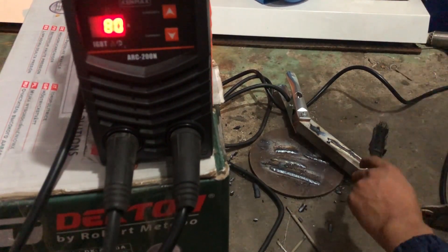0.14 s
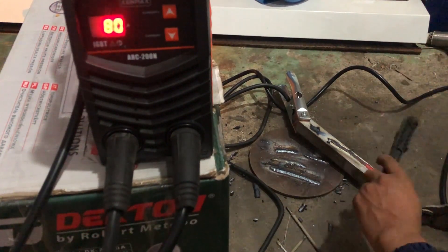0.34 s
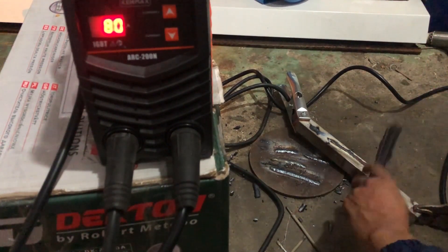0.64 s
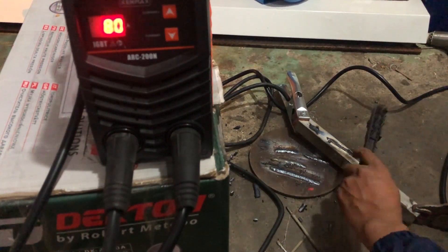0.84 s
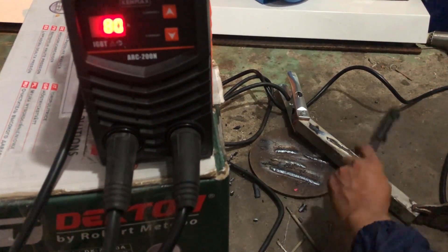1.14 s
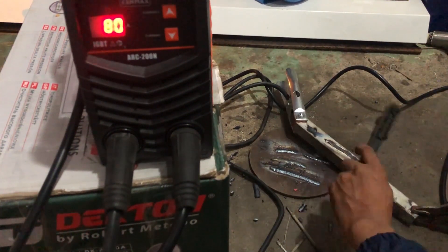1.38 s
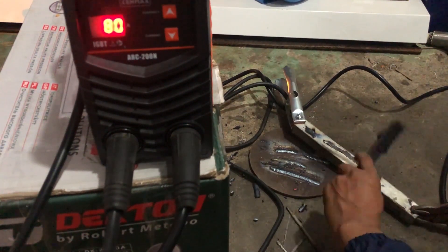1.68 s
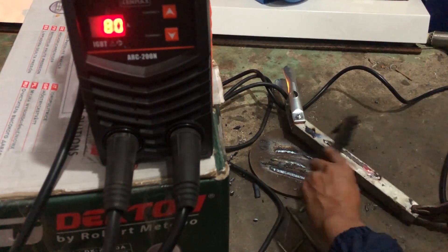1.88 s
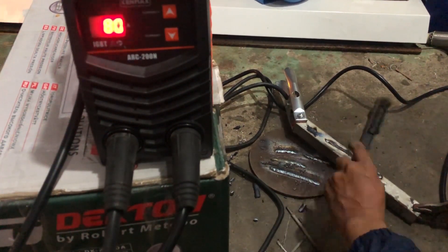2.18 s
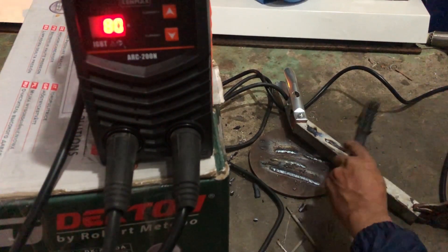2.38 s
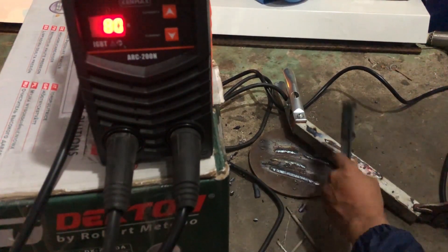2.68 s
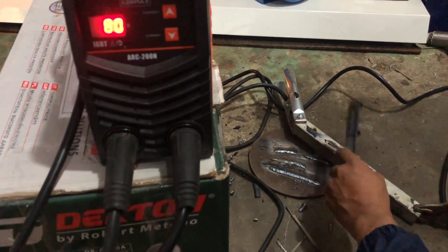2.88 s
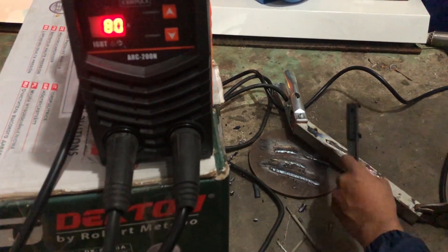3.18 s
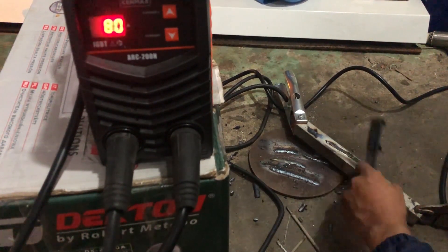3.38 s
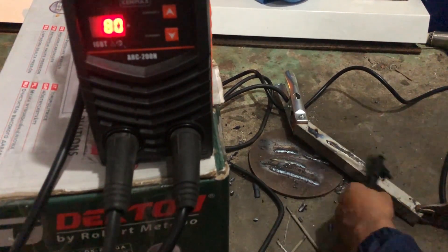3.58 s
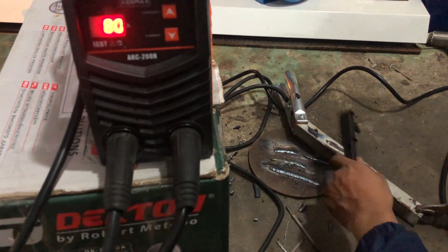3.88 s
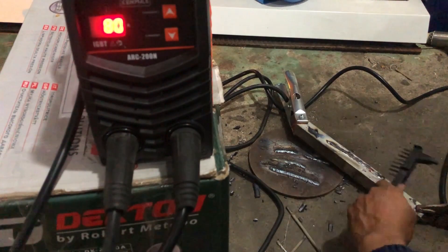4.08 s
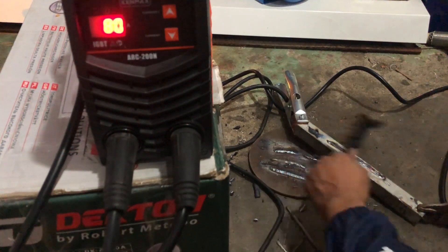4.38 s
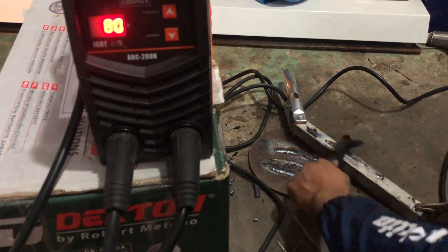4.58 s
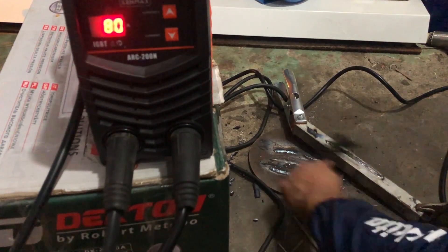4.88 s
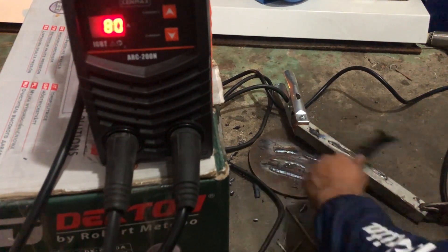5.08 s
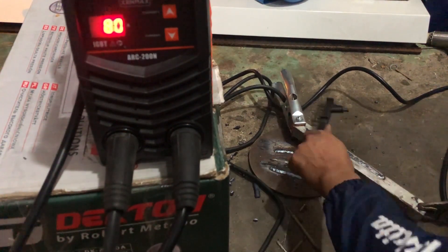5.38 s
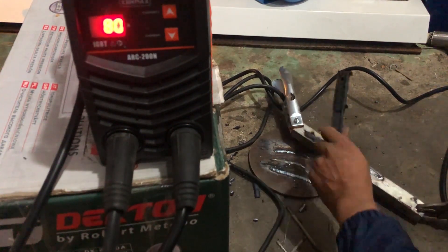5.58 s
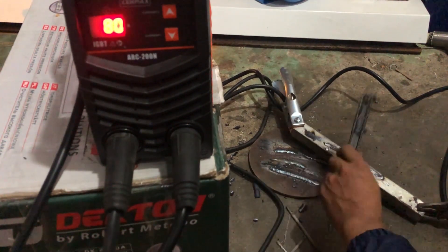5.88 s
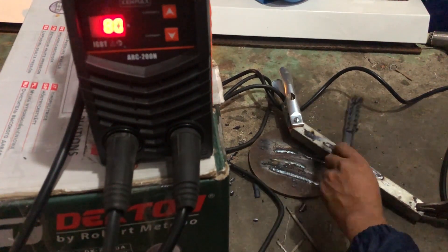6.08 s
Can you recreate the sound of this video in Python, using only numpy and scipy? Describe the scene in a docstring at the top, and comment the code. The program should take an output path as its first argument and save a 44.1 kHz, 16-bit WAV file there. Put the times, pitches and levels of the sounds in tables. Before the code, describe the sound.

Dry clicks open the sound right at the microphone, then steady steel clanks begin, roughly four per second, some with a quick rebound and a dull floor thud. Midway the hammer skids over rough metal with short rasps and weaker taps, before two strong closing strikes. A small hard room answers briefly; quiet hum, fan and deep rumble lie underneath, and peaks clip.

```python
"""Sharp steel blows ring out: a small hammer chips slag off a hollow steel bar on a workshop floor, then scrapes
along the weld. The bar is noise bursts through many short modes with a brief answer from the walls; the floor thuds.
Close to the microphone, dry ticks are crackle through resonances and a thin rustle is fine grains near 10 kHz;
hollow knocks and a short squeak are damped or narrow resonances. A machine fan and the street rumble below are
shaped noise. The loudest blows overload the recorder."""
import sys
import numpy as np
from scipy import signal
from scipy.fft import rfft, irfft
from scipy.io import wavfile

SR = 44100
rng = np.random.default_rng(int(sys.argv[2]) if len(sys.argv) > 2 else 0)


def to_wav(sig):
    """Store sig (one row per channel, or 1-D mono) as 16-bit WAV at the path in sys.argv[1].

    Samples outside -1..1 are clipped; the rate is SR.
    """
    pcm = np.clip(np.atleast_2d(sig), -1, 1) * 32767
    pcm = np.round(pcm).astype(np.int16)
    wavfile.write(sys.argv[1], SR, pcm.T)  # frames by channels


N = 275488
TIME = np.arange(N) / SR
SILENCE = 1e-18   # tiny floor that keeps the filters away from zero


def from_db(db):
    """Gain of a level in dB."""
    return 10 ** (np.asarray(db) / 20)


def rms_one(x):
    """Scale to rms 1."""
    return x / np.sqrt(np.mean(x ** 2) + 1e-20)


def at_hz(points, hz):
    """Read a table of (Hz, value) on a log-frequency axis."""
    table = np.array(points)
    return np.interp(np.log(hz), np.log(table[:, 0]), table[:, 1])


def coloured(spectrum):
    """Steady noise of a given spectrum; rms 1."""
    hz = np.maximum(np.fft.rfftfreq(N, 1 / SR), 1)
    white = rfft(rng.standard_normal(N))
    return rms_one(irfft(white * from_db(at_hz(spectrum, hz)), N))


def resonance(x, hz, width_hz):
    """Two-pole peak with gain of about 1 on top; a narrower width rings longer."""
    r = np.exp(-np.pi * width_hz / SR)
    numerator = [(1 - r * r) / 2, 0, (r * r - 1) / 2]
    denominator = [1, -2 * r * np.cos(2 * np.pi * hz / SR), r * r]
    return signal.lfilter(numerator, denominator, x)


def dying(t60):
    """Envelope falling 60 dB in t60 seconds, cut off after half a second."""
    return from_db(-60 * TIME[:SR // 2] / t60)


def swell(s, length, db, rise, fall):
    """Gain that rises to a level, holds it from s for length, and falls away, straight in dB."""
    before = np.maximum(s - TIME, 0)
    after = np.maximum(TIME - s - length, 0)
    return from_db(db - rise * before - fall * after)


def wander(rate):
    """Random line through about rate knots per second, with spread 1 at the knots."""
    knots = np.arange(0, N / SR + 1, 1 / rate)
    return np.interp(TIME, knots, rng.standard_normal(2000)[:len(knots)])


def grit(per_s, spread_db):
    """Random clicks of uneven size and either sign; rms 1."""
    sizes_db = spread_db * np.minimum(rng.exponential(1, N), 5)
    sizes = from_db(sizes_db) * rng.choice([-1, 1], N)
    return rms_one(sizes * (rng.random(N) < per_s / SR))


def add(out, s, piece):
    """Mix a piece in at a time in seconds."""
    i = round(s * SR)
    out[i:i + len(piece)] += piece[:N - i]


# Background levels; the deep rumble swells late, the hum sags in the middle.
# Each row: time in seconds, deep rumble in dB, hum in dB.
ROOM_LEVELS = [(0, -48, -37), (2, -47.5, -39), (3.299, -44, -42.5), (4.5, -48, -40.5), (4.9, -37, -40.5),
               (5.8, -37, -40), (6.25, -38.5, -38.5)]
# Level of the machine fan. Each row: time in seconds, level in dB.
FAN_LEVEL = [(0, -51.5), (1.5, -53.5), (4.2, -53.5), (5.2, -50.5), (6.25, -46)]
# Spectra of deep rumble, hum, fan and air. Each row: frequency in Hz, relative density in dB per Hz.
DEEP_SPECTRUM = [(8.8, -20), (15, 1.5), (43, 13), (70, -18), (90, -37), (120, -54), (200, -120)]
HUM_SPECTRUM = [(29, -39), (50, 0), (139, 0.5), (184, -8), (285, -11.5), (449, -13.5), (512, -17.5),
                (634, -19.5), (920, -30.5), (1200, -28), (1560, -54.5), (2640, -120)]
FAN_SPECTRUM = [(240, -31.5), (400, -7), (496, -11.5), (581, -7.5), (1010, -11), (1910, -10.5),
                (2240, -16.5), (6000, -25), (7800, -60.5), (13200, -120)]
AIR_SPECTRUM = [(1800, -17), (3000, -2.5), (5000, -3.5), (8000, 1.5), (10500, 1.5), (12600, -3.5),
                (15500, -3.5), (16000, -25.5)]
AIR_DB = -55


def background():
    """Deep rumble, hum and fan as shaped noise with slowly changing levels, over steady air noise."""
    s, deep_db, hum_db = np.transpose(ROOM_LEVELS)
    deep = from_db(np.interp(TIME, s, deep_db)) * coloured(DEEP_SPECTRUM)
    hum = from_db(np.interp(TIME, s, hum_db)) * coloured(HUM_SPECTRUM)
    fan = from_db(np.interp(TIME, *np.transpose(FAN_LEVEL))) * coloured(FAN_SPECTRUM)
    air = from_db(AIR_DB) * coloured(AIR_SPECTRUM)
    return deep + hum + fan + air


# Puffs of thin rustle close to the microphone. Each row: start in seconds, length in seconds, level in dB.
RUSTLE_PUFFS = [(0.214, 0.17, -55), (1.27, 0.06, -55), (2.567, 0.0073, -43), (4.462, 0.019, -42),
                (4.522, 0.017, -51), (4.976, 0.033, -44.5), (5.291, .02, -40), (5.472, .025, -41.5),
                (5.573, 0.0096, -42.5), (5.631, 0.059, -45), (5.764, 0.06, -48.5)]
RUSTLE_RISE_DB_PER_S, RUSTLE_FALL_DB_PER_S = 800, 602


def rustle():
    """Fine grains pass twice through a broad resonance near 10 kHz and come in puffs."""
    grains = resonance(resonance(grit(7000, 2.9), 9680, 3400), 9680, 3400)
    puffs = sum(swell(*row, RUSTLE_RISE_DB_PER_S, RUSTLE_FALL_DB_PER_S) for row in RUSTLE_PUFFS)
    return puffs * rms_one(grains)


# Dull knocks on something hollow. Each row: time in seconds, peak in dB, low resonance in Hz.
KNOCKS = [(0.679, -11.5, 566), (0.968, -25, 426)]


def knocks():
    """A tap and a little crackle excite a damped low resonance, its overtone and a broad band above."""
    out = np.zeros(N)
    grains = rng.standard_normal((len(KNOCKS), 4000))
    grains[:, 0] = 13.0   # the tap
    for (s, db, hz), grain in zip(KNOCKS, grains):
        puff = grain * dying(0.04)[:4000]
        above = resonance(resonance(puff, 1400, 1600), 1400, 1600)
        overtone = resonance(puff, 1.71 * hz, 160)
        body = resonance(puff, hz, 69) + 0.17 * overtone + 0.034 * above
        add(out, s, from_db(db) * body / np.max(np.abs(body)))
    return out


# Dry ticks near the microphone.
# Each row: time in seconds, crackle drive in dB, low push in dB relative to that drive.
TICKS = [(0.0034, 3.5, -29), (0.0149, 7, -38), (0.0368, -13.5, -19), (0.0515, -26, -13), (0.191, -42.5, 4),
         (0.2276, -16.5, -16), (0.27, -28, -11.5), (0.3143, -21.5, -13), (1.2241, -15, -17),
         (1.2314, 7, -29), (1.3336, 8, -25.5), (1.349, -2, -37), (1.3572, -10, -31), (2.009, -21, -34),
         (4.5116, -40, -15), (4.7404, -15.5, -20.5), (4.7621, -23, -15.5), (4.82, -19, -22),
         (4.9082, -35, -23), (5.2255, -12.5, -17), (5.278, -6.5, -24.5), (5.4864, -22.5, -14),
         (5.581, -19.5, -40)]
# Resonances that colour the crackle. Each row: frequency in Hz, width in Hz, level in dB.
TICK_RESONANCES = [(2800, 1100, -12), (7040, 9400, -11.5), (10250, 840, 5.5), (14000, 3000, -30)]


def ticks():
    """A few milliseconds of dying crackle through broad resonances, with a soft low push."""
    crack, push = np.full(N, SILENCE), np.full(N, SILENCE)
    grains = rng.standard_normal((len(TICKS), 400))
    grains[:, 0] = 0.97   # a set first click
    for (s, db, low_db), grain in zip(TICKS, grains):
        add(crack, s, from_db(db) * grain * dying(0.005)[:400])
        add(push, s, from_db(db + low_db + 25.5) * np.ones(1))
    bright = sum(from_db(db) * resonance(crack, hz, width) for hz, width, db in TICK_RESONANCES)
    return bright + resonance(push, 460, 800) + 3.23 * resonance(push, 150, 380)


SQUEAK_S, SQUEAK_LENGTH_S, SQUEAK_DB = 5.195, 0.032, -40
SQUEAK_HZ, SQUEAK_WIDTH_HZ = 3400, 450


def squeak():
    """The hammer edge catches and squeaks: grains through one narrow resonance."""
    grains = resonance(grit(3000, 3.4), SQUEAK_HZ, SQUEAK_WIDTH_HZ)
    return swell(SQUEAK_S, SQUEAK_LENGTH_S, SQUEAK_DB, 900, 980) * rms_one(grains)


# Hammer blows and rebounds, played by the floor here and by the bar below; where the hammer lands tips the balance.
# Each row: time in seconds, drive in dB, then offsets of the lowest, low and top modes in dB,
# and floor thud drive in dB.
BLOWS = [(0.5823, -3, 2, 1.5, 4, -46), (0.8436, -3.5, 3, -1, -2.5, -34), (1.0849, -3.5, 2, 1, 3, -31),
         (1.3668, 0, -4.5, -1.5, -5, -48), (1.4016, -31.5, 3, -13, 13.5, -42),
         (1.625, -7, 4, 4.5, 0.5, -58), (1.6636, -8.5, -6, -3.5, -3.5, -50),
         (1.8928, -7.5, 1.5, 5, 1.5, -53), (1.923, -9, -5, -4.5, -6, -46),
         (2.1638, -1, -0.5, -2.5, 3.5, -24.5), (2.411, -3.5, 5, 4, 0, -54), (2.4725, -24.5, -14, 3, 9, -58),
         (2.652, 3, -4, -1, -0.5, -16.5), (2.8842, -4, 4.5, 2, -3, -36), (3.1572, 1, -1.5, 1, -0.5, -17),
         (3.4048, -6.5, 2, 6.5, 3, -33.5), (3.6986, -1.5, -13, 0.5, -1, -28),
         (4.3193, -15, 5, 5.5, -13, -42), (4.4058, -32.5, 26, 12, -8, -60), (5.0067, -18, 10.5, 8, -5, -38),
         (5.068, -26, 21, 13, -5, -50), (5.1574, -34, 13, 1, 11, -36.5), (5.3187, -19, -16, -5, 1, -53),
         (5.8418, 1.5, 1.5, 0, 2, -28), (6.094, -3.5, 3, 2.5, -3.5, -31), (6.1498, -22, 19.5, 7, -9, -43)]
BUMP_DB, BUMP_HZ, BUMP_WIDTH_HZ = 44.5, 35, 43   # low bump, its drive over the thud's


def thuds():
    """The floor under the bar takes each blow as a short dull puff with a low bump."""
    puffs, push = np.full(N, SILENCE), np.full(N, SILENCE)
    grains = rng.standard_normal((len(BLOWS), 1500))
    for row, grain in zip(BLOWS, grains):
        s, thud_db = row[0], row[-1]
        add(puffs, s, from_db(thud_db + 16) * grain * dying(0.031)[:1500])
        add(push, s, from_db(thud_db + BUMP_DB) * np.ones(1))
    dull = resonance(resonance(puffs, 372, 690), 371, 690)
    return dull + resonance(push, BUMP_HZ, BUMP_WIDTH_HZ)


# Decay of the tail in the walls. Each row: frequency in Hz, time to fall 60 dB in seconds.
TAIL_T60 = [(600, 0.41), (1500, 0.25), (4000, 0.28), (9000, 0.27), (15000, 0.23)]
CLANG_DB = -8.5   # all blows on the bar
CHATTER_T60_S, TAIL_DB = 0.048, -14   # rattle on the floor, then the tail's level relative to it
REBOUND_WITHIN_S, REBOUND_TAIL_DB = .1, -21.5   # a rebound rests on the bar and leaves less tail


def blow_envelopes(hz):
    """In one band, each blow starts a fast-dying chatter and a tail that builds up and dies slower."""
    chatter, echo = np.full(N, SILENCE), np.full(N, SILENCE)
    gaps_s = np.diff(np.array(BLOWS)[:, 0], prepend=0)
    tails_db = np.where(gaps_s < REBOUND_WITHIN_S, REBOUND_TAIL_DB, TAIL_DB)
    build_up = 1 - dying(0.022 * np.sqrt(4000 / hz))
    tail = dying(at_hz(TAIL_T60, hz)) * build_up
    for (s, db, lowest_db, lows_db, tops_db, _), tail_db in zip(BLOWS, tails_db):
        balance = [(1300, lowest_db), (2600, lows_db), (4000, lows_db), (6700, 0), (11000, tops_db)]
        level = from_db(db + CLANG_DB + at_hz(balance, hz))
        add(chatter, s, level * dying(CHATTER_T60_S))
        add(echo, s, level * from_db(tail_db) * tail)
    return chatter, echo


# The hammer edge skids over the weld.
# Each row: start in seconds, length in seconds, drive in dB, brightness tilt in dB.
SCRAPES = [(4.345, .016, -22.5, 3), (4.636, 0.0056, -28.5, -2), (4.674, 0.02, -21, 4.5),
           (4.728, 0.036, -27, 4), (4.776, 0.048, -33, 7), (5.015, 0.037, -30, 9),
           (5.053, 0.035, -22.5, -5.5), (5.153, .055, -37.5, 14), (5.348, 0.02, -20, 3.5),
           (5.382, 0.068, -36, 8)]
SCRAPE_RISE_DB_PER_S, SCRAPE_FALL_DB_PER_S = 1492, 448


def scrape_force(hz, grains, skids):
    """In one band, the rubbing edge gives grains whose colour shifts along the weld."""
    lean = np.clip(np.log2(hz / 6500) / 1.03, -1.5, .6)   # how far brightness lifts this band
    pressed = from_db(lean * np.array(SCRAPES)[:, 3]) @ skids
    return grains * pressed * from_db(-11.5 + 3.8 * wander(33))


# Modes of the bar that stand out, damped by the floor.
# Each row: frequency in Hz, width in Hz, gain over the dense modes in dB.
BAR_MODES = [(1259, 28, 12), (1297, 22, 12), (1523, 35, 4), (2277, 35, 5), (2545, 26, 13), (2625, 18, 12),
             (2697, 22, 11), (3404, 30, 9), (4000, 30, 8), (4345, 30, 9), (4445, 30, 10), (4840, 35, 7),
             (5410, 35, 7), (5880, 35, 8), (6055, 22, 11), (6234, 20, 10), (6482, 35, 12), (6760, 38, 12),
             (6982, 30, 10), (7290, 30, 11), (7565, 35, 7), (8377, 45, 9), (8780, 35, 9), (9565, 45, 7),
             (10200, 45, 10), (10840, 60, 8), (11440, 60, 6), (12941, 40, 6)]
# Dense modes and their echo off the walls. Each row: frequency in Hz, relative density in dB per Hz.
CLANG_SPECTRUM = [(410, -23), (700, -30), (1090, -21), (1280, -8), (1660, -16), (2560, -4), (2990, -7),
                  (6570, -1.5), (11500, -3), (14200, -6.5), (16000, -39)]
# How the standing-out modes are fed; the low ones bloom late.
# Each row: frequency in Hz, feed from the chatter in dB, feed from the tail in dB.
MODE_FEED = [(1323, -38.5, 8), (2600, -6, -1.5), (5330, -3, -5.5), (12000, 2.5, -1.5)]
RUB_INTO_MODES_DB = -5


def bar():
    """Blows and rubbing feed, band by band, the bar's dense modes and the resonances that stand out."""
    edges = 500 * 2 ** np.arange(0, 5.3, 1 / 3)   # third-octave bands, Hz
    white, out = rng.standard_normal((2, N)), np.zeros(N)
    feed = np.array(MODE_FEED)
    latest_blow = np.maximum(np.searchsorted(np.array(BLOWS)[:, 0], TIME) - 1, 0)
    # each blow favours other modes
    favours = from_db(4.24 * rng.standard_normal((len(BLOWS), len(BAR_MODES))))
    skids = np.array([swell(*row[:3], SCRAPE_RISE_DB_PER_S, SCRAPE_FALL_DB_PER_S) for row in SCRAPES])
    rub_grains = grit(3600, 3.5)
    reference = np.sqrt(3000) * from_db(at_hz(CLANG_SPECTRUM, 6180))
    for k, (low, high) in enumerate(zip(edges, edges[1:])):
        hz = np.sqrt(low * high)
        noise = white[k % 2]   # neighbouring bands get separate noise
        chatter, echo = blow_envelopes(hz)
        rubs = scrape_force(hz, rub_grains, skids)
        dense = noise * np.hypot(chatter, echo) + rubs
        band = signal.butter(2, [low, high], "band", fs=SR, output="sos")
        answer = signal.sosfilt(band, dense)
        from_chatter = from_db(at_hz(feed[:, :2], hz)) * chatter
        from_tail = from_db(at_hz(feed[:, ::2], hz)) * echo
        force = noise * np.hypot(from_chatter, from_tail) + from_db(RUB_INTO_MODES_DB) * rubs
        for m, (mode_hz, width_hz, db) in enumerate(BAR_MODES):
            if low <= mode_hz < high:
                answer += from_db(db) * resonance(favours[latest_blow, m] * force, mode_hz, width_hz)
        out += from_db(at_hz(CLANG_SPECTRUM, hz)) * np.sqrt(SR / 2) / reference * answer
    return out


def scene():
    """All sources at one microphone."""
    return (bar() + squeak() + thuds() + ticks() + knocks() + rustle() + background())[None]


CUTOFF_HZ = 16800


def record(dry):
    """The recorder clips at 0.9 of full scale, then a steep low-pass cuts the top."""
    cut = signal.cheby2(14, 55, CUTOFF_HZ, fs=SR, output="sos")
    return signal.sosfilt(cut, np.clip(dry, -.9, .9))


dry = scene()
out = record(dry)
to_wav(out)
```